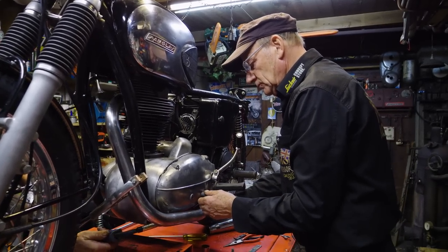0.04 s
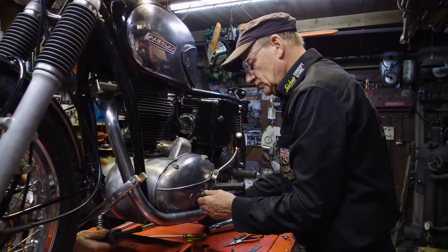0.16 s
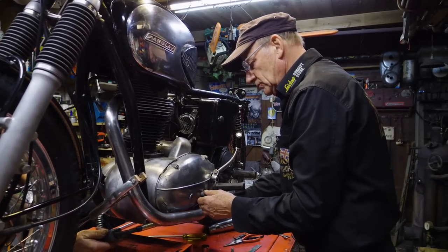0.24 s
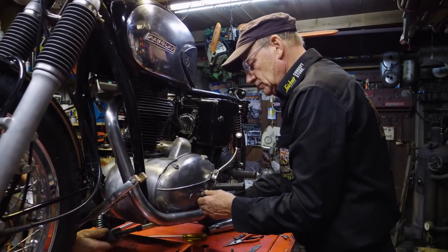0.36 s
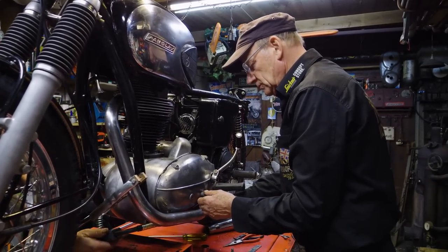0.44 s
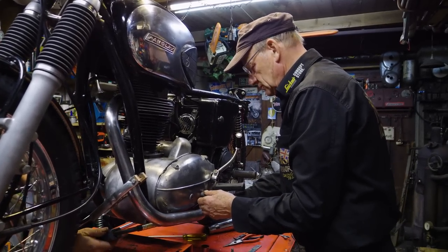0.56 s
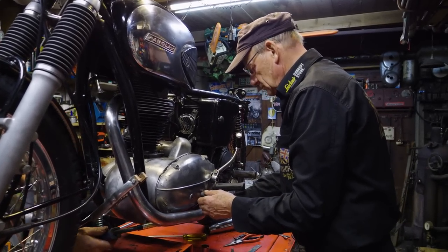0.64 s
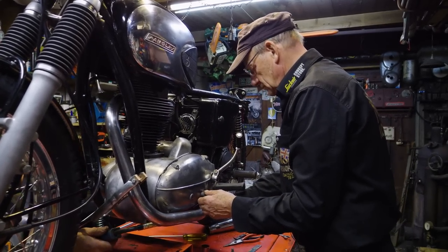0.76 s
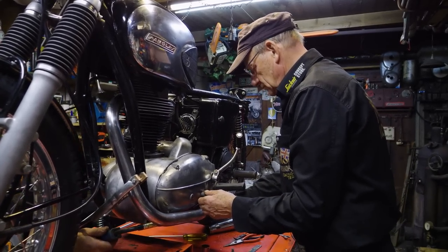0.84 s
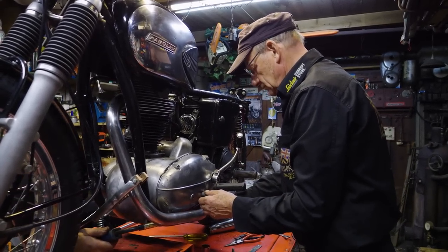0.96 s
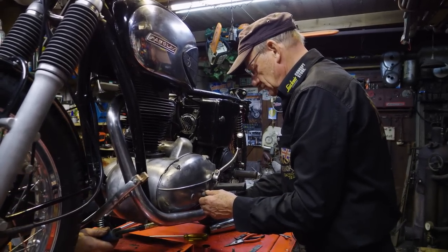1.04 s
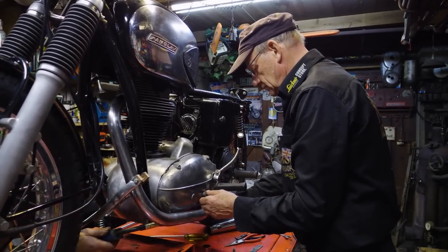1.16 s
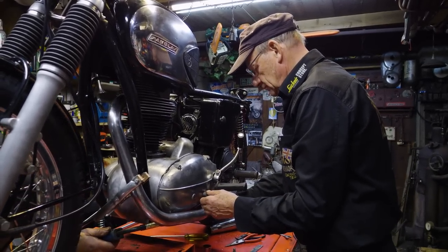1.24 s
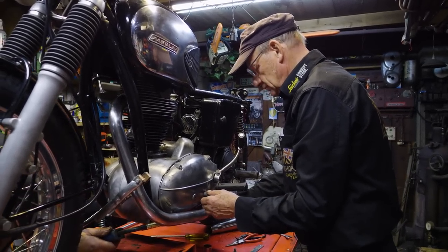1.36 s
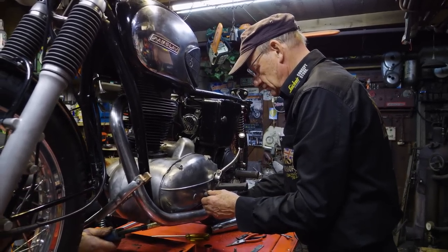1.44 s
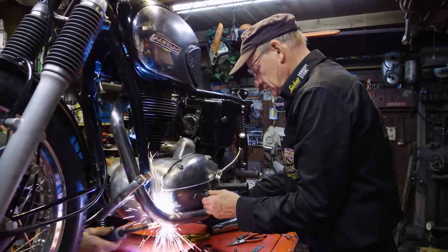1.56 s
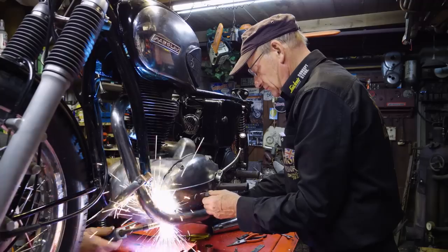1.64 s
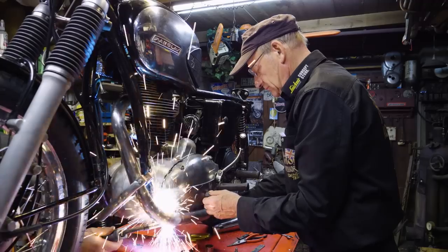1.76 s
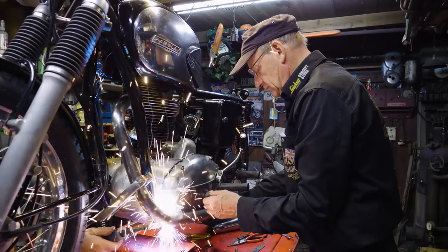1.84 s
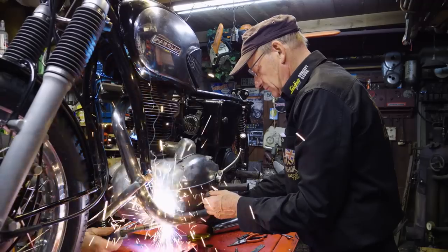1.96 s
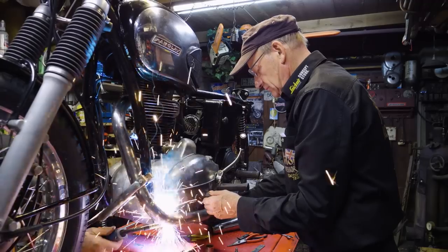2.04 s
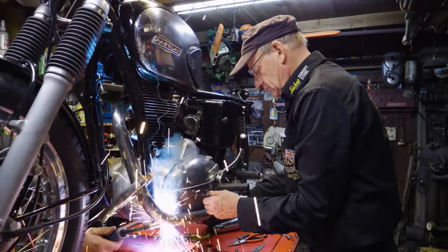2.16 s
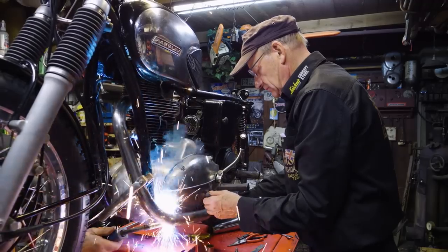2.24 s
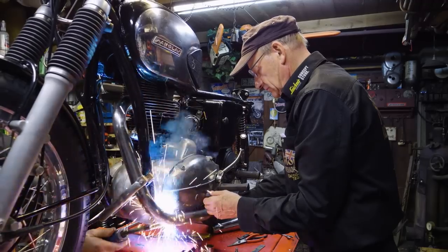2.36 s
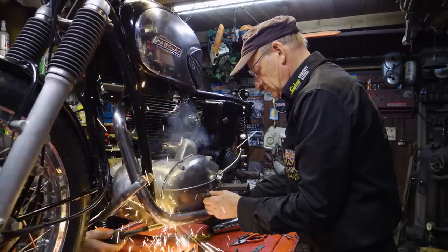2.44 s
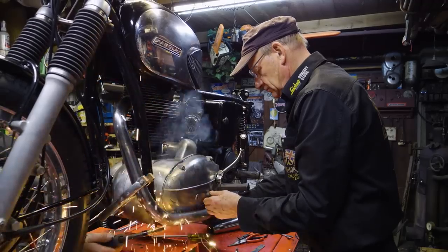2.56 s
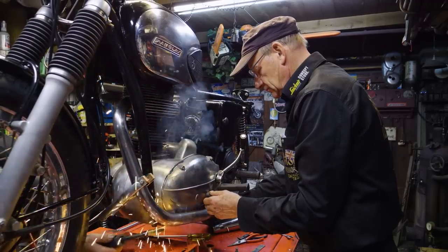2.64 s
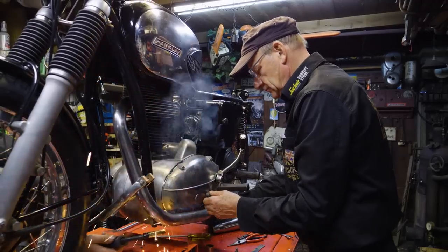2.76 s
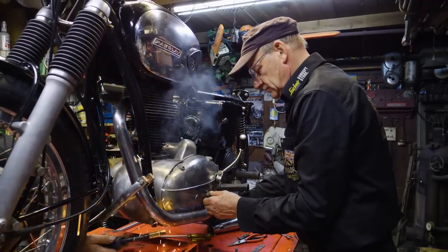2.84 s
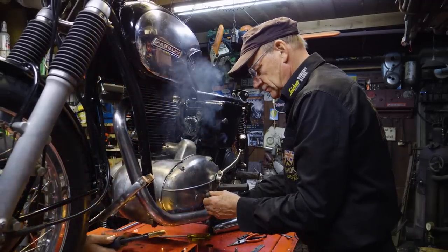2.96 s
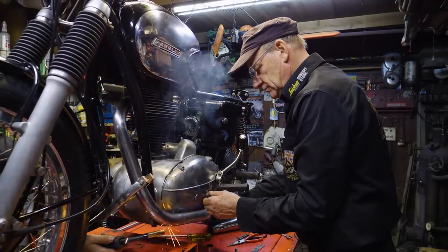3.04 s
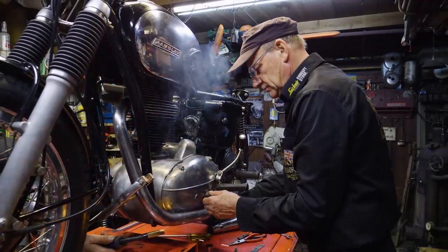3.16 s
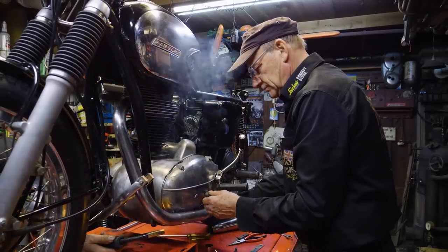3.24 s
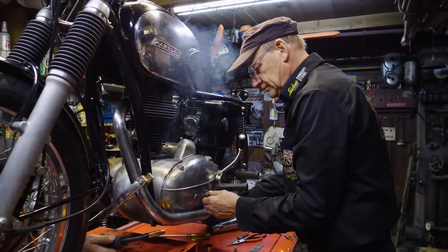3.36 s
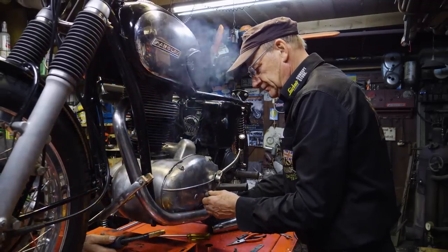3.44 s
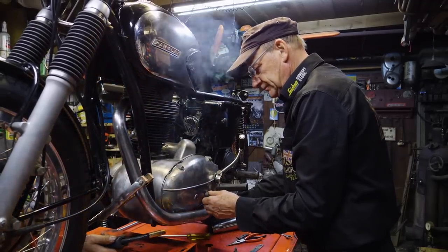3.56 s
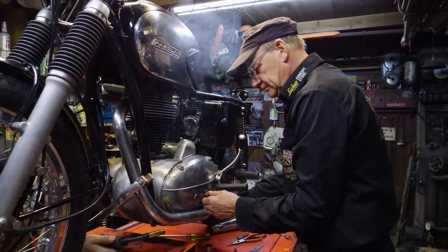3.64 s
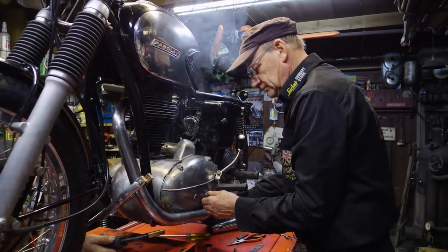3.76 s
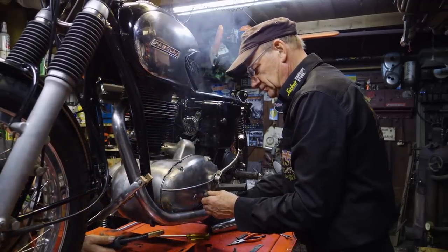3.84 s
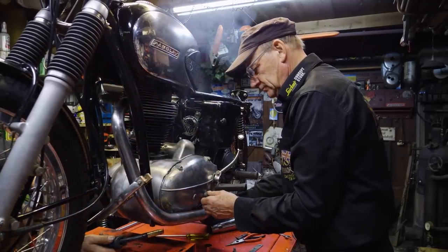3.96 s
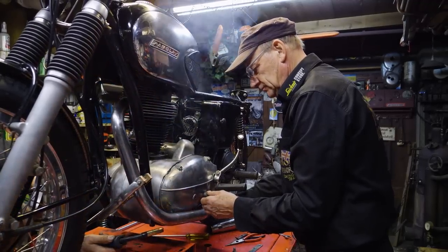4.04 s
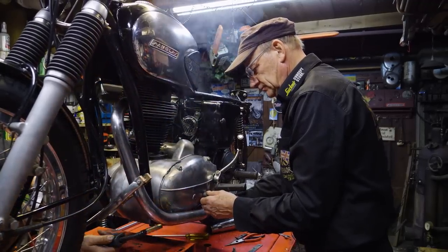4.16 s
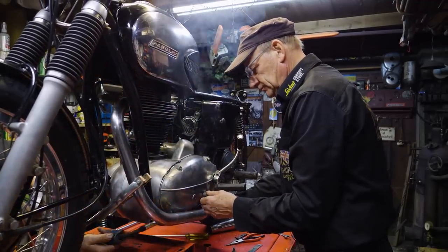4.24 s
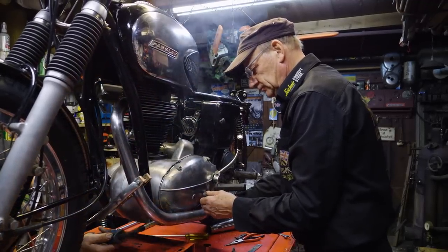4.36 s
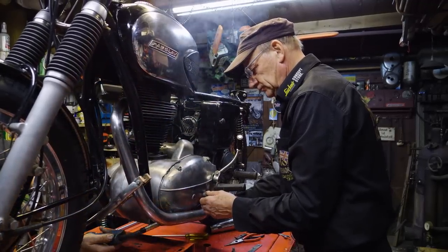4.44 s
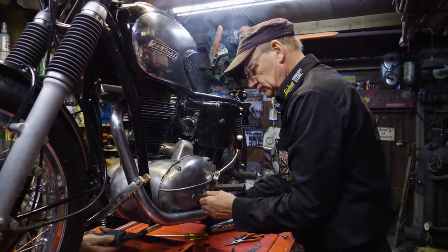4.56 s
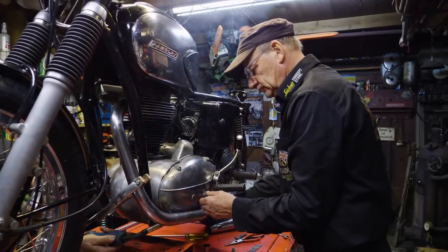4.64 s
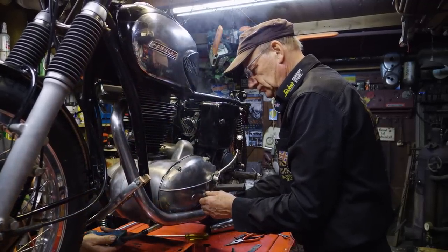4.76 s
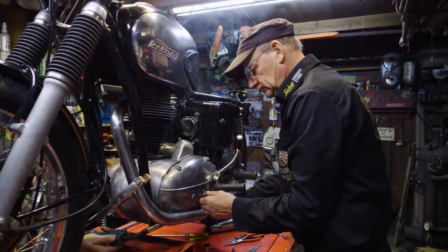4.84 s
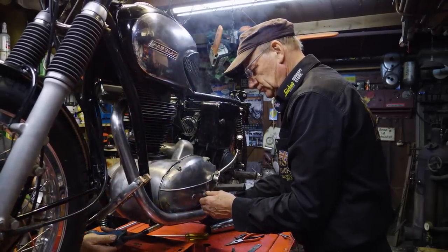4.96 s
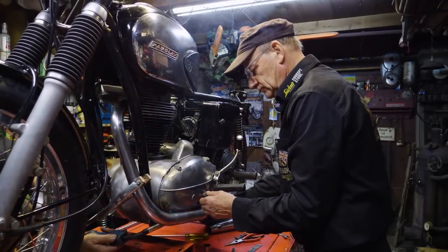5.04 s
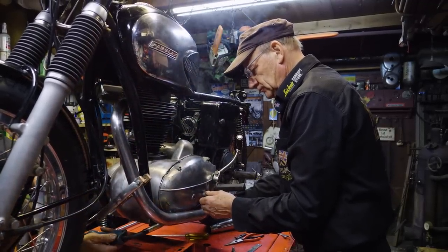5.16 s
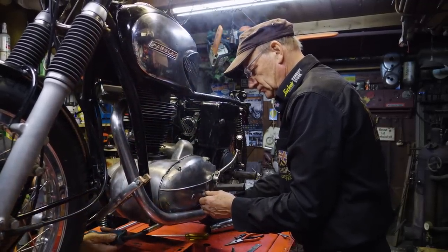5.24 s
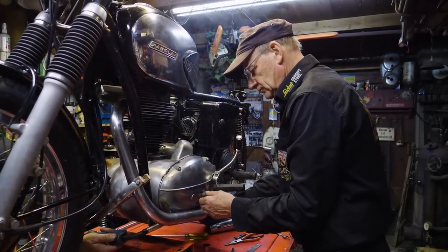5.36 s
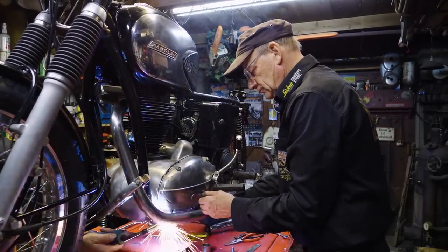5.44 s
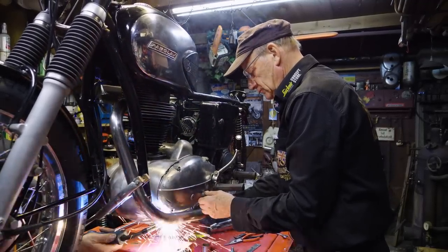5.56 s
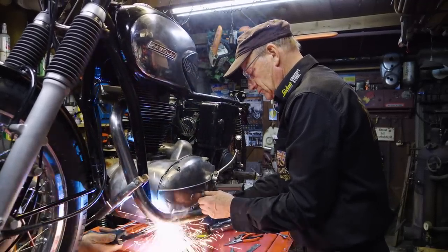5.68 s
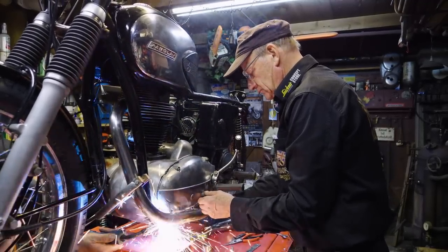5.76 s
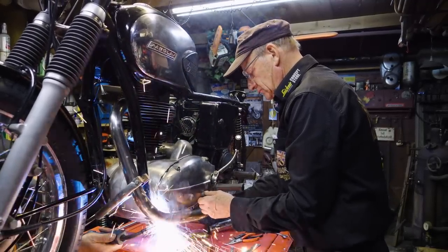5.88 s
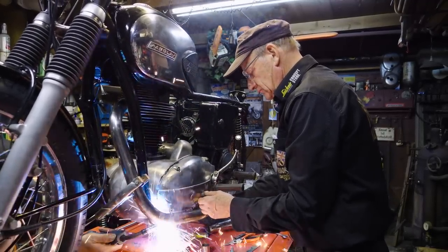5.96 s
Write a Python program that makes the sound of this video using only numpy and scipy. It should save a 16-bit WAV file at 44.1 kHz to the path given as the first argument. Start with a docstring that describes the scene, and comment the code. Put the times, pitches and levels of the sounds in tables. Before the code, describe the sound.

Two short arc welds on a steel pipe crackle harshly over a low hum, with metal knocks, clinks and cooling ticks between them in a workshop.

```python
"""A small workshop: two short wire-arc welds on a steel pipe, heard from a metre away.
Each arc strikes with a flare of spiky noise and a surge of low hum, then crackles in quick pops that
echo off nearby parts. Between the welds, short cracks of noise tick as the bead cools; hands knock,
clink, rub and touch parts, made from dying sines and shaped noise. Air, mains tones and thumps lie below."""
import sys
import numpy as np
from scipy import signal
from scipy.fft import rfft, irfft
from scipy.io import wavfile
from scipy.ndimage import uniform_filter1d

SR = 44100
rng = np.random.default_rng(int(sys.argv[2]) if len(sys.argv) > 2 else 0)


def int16_out(signal):
    """Quantize to a 16-bit WAV file."""
    q = np.round(np.clip(np.atleast_2d(signal).T, -1, 1) * 32767)
    wavfile.write(sys.argv[1], SR, q.astype(np.int16))


def invert_db(x):
    """Field ratio 10**(x/20) for x, a level in decibels (scalar or array-like)."""
    u = np.asarray(x, float) / 20
    return 10 ** u


N = 265085  # samples, about 6 s


def evened(x):
    """Scales a sound to an rms of 1."""
    return x / np.sqrt(np.mean(x ** 2) + 1e-20)


def read(points, hz):
    """Reads a table of values against frequency, on a log frequency axis."""
    f, value = np.transpose(points)
    return np.interp(np.log(hz + 1), np.log(f + 1), value)


def curve(rows):
    """Turns (time [s], level [dB]) into a gain along time; silent outside the table."""
    s, db = np.transpose(rows)
    return invert_db(np.interp(np.arange(N) / SR, s, db, -200, -200))


def add(mix, s, sound, pan_db=0):
    """Lays a sound into both channels from time s; pan_db is left over right."""
    part = mix[:, round(s * SR):][:, :len(sound)]
    part += invert_db([[pan_db / 2], [-pan_db / 2]]) * sound[:part.shape[1]]


def noise(gain, size=N):
    """Noise of rms 1 whose spectrum follows gain(hz)."""
    spectrum = rfft(rng.standard_normal(size))
    return evened(irfft(spectrum * gain(np.fft.rfftfreq(size, 1 / SR)), size))


def humps(modes):
    """Spectrum with a hump at each resonance (Hz, width Hz, dB); their powers add."""
    def gain(hz):
        return np.sqrt(sum(invert_db(2 * db) / (1 + (2 * (hz - f) / w) ** 2) ** 2 for f, w, db in modes))
    return gain


def rung(modes, t):
    """Struck resonances (Hz, dB, t60 s): sines that die by 60 dB in their t60."""
    return sum(invert_db(db - 60 * t / t60) * np.sin(2 * np.pi * hz * t) for hz, db, t60 in modes)


def resonate(x, hz, width):
    """A resonance that follows a moving pitch: shifts it down to zero, smooths twice and shifts back."""
    turn = np.exp(2j * np.pi * np.cumsum(hz) / SR)
    r = np.exp(-np.pi * width / SR)
    smooth = signal.lfilter([(1 - r) ** 2], [1, -2 * r, r * r], x / turn)
    return 2 * (turn * smooth).real


def swells(rows, rise_db_per_s):
    """Gain along time of events (s, dB, held s, t60 s) that rise, hold and die; their powers add."""
    t = np.arange(0, N + 32, 32) / SR
    db = []
    for s, peak_db, held, t60 in rows:
        before, after = np.maximum(s - t, 0), np.maximum(t - s - held, 0)
        db.append(peak_db - rise_db_per_s * before - 60 * after / t60)
    return np.interp(np.arange(N) / SR, t, np.sqrt(invert_db(2 * np.array(db)).sum(0)))


# colour of the hiss and shop air: (frequency [Hz], level per Hz [dB])
AIR_COLOUR = [(30, -42), (60, -24.5), (110, -4.5), (200, -18), (500, -15.5), (1000, -19.5), (2200, -24),
              (5000, -23.5), (9000, -21.5), (15000, -17.5), (16200, -25.5), (17000, -57.5)]
# how alike the air is in left and right: (frequency [Hz], likeness [0 to 1])
AIR_LIKENESS = [(60, 0.87), (240, 0.82), (950, 0.92), (3770, 0.96), (15000, 0.94)]
# how loud the air is over time: (time [s], level [dB])
AIR_LEVEL = [(0, -60.5), (1.4, -59), (2.9, -61.5), (3.7, -65.5), (4.3, -62), (5.2, -62.5), (6.01, -52)]
# tones of lamps and transformer: (frequency [Hz], width [Hz], level [dB])
MAINS_TONES = [(101, 22, -64), (315.8, 9.9, -76.5)]


def background():
    """Microphone hiss and shop air as coloured noise; narrow noise makes wavering mains tones."""
    a, b = (noise(lambda hz: invert_db(read(AIR_COLOUR, hz))) for _ in range(2))
    same = np.clip(read(AIR_LIKENESS, np.fft.rfftfreq(N, 1 / SR)), 0, 1)
    right = irfft(same * rfft(a) + np.sqrt(1 - same ** 2) * rfft(b), N)
    mains = sum(invert_db(db) * noise(humps([(hz, w, 0)])) for hz, w, db in MAINS_TONES)
    return curve(AIR_LEVEL) * np.array([a, right]) + mains


# how long the room rings: (frequency [Hz], t60 [s])
ROOM_DECAY = [(150, 0.83), (500, 0.32), (2000, 0.28), (6000, 0.26), (14000, 0.099)]


def shop(x):
    """Room echo: sparse taps of random sign, each frequency band dying at its own speed."""
    taps = np.zeros((2, SR // 2))
    # one tap in every 20 samples, at a random place
    at = np.arange(260, SR // 2 - 20, 20) + rng.integers(0, 20, (2, (SR // 2 - 261) // 20))
    np.put_along_axis(taps, at, rng.choice([-1., 1.], at.shape), 1)
    taps = taps[0] + 0.26 * np.array([taps[1], -taps[1]])  # the two microphones sit close together
    hz, t, z = signal.stft(taps, SR, nperseg=256)
    fade = invert_db(-60 * t / read(ROOM_DECAY, hz)[:, None])
    tail = signal.istft(z * fade, SR, nperseg=256)[1]
    return signal.oaconvolve(x, tail / np.linalg.norm(tail[0]), axes=1)[:, :N]


# low tones of the hum: (frequency [Hz], width [Hz], level [dB])
HUM_TONES = [(148.5, 25, -2.5), (180.1, 63, -8), (114.5, 25, -6.5)]
# the welder takes load: (time of the surge [s], surge level [dB], steady level [dB], end [s])
WELDER_LOADS = [(1.575, -19, -38, 2.46), (5.476, -18.5, -36, 6.01)]
# low thumps through the bench: (time [s], level [dB], held [s], t60 [s])
BENCH_THUMPS = [(.52, -48, 0.0088, 0.3), (.79, -45, .02, 0.72), (.95, -42, 0.005, 0.22),
                (2.48, -34, 0.005, .3), (2.64, -37.5, 0.005, .2), (3.92, -66, .02, .5),
                (4.45, -41.5, 0.005, 0.86), (4.84, -39, 0.075, 0.19), (5.31, -38, 0.0047, 0.097),
                (5.56, -31.5, 0.0038, 0.048)]


def hum():
    """The hum surges as the arc strikes, settles under load and dies away; thumps ring the same low tones."""
    idle_db, rise_s, fall_s, bend, unload_t60 = -73.5, .075, .047, 2.1, .88
    t = np.arange(N) / SR
    power = invert_db(2 * idle_db) + swells(BENCH_THUMPS, rise_db_per_s=400.5) ** 2
    for s, surge_db, load_db, end in WELDER_LOADS:
        off = np.maximum((s - t) / rise_s, (t - s) / fall_s)
        power += invert_db(2 * np.maximum(surge_db - 30 * off ** bend, -200))  # 30 dB down at either end
        power += (t > s) * invert_db(2 * (load_db - 60 * np.maximum(t - end, 0) / unload_t60))
    return np.sqrt(power) * noise(humps(HUM_TONES)) * invert_db([[-1], [1.2]])


# hands slide a hollow part: (time [s], level [dB], pitch [Hz], held [s], t60 [s])
HAND_SLIDES = [(.08, -55.5, 519, .002, 0.26), (0.293, -51, 690, 0.0023, .19), (.45, -67, 474, .27, .3),
               (0.751, -34, 512, 0.018, .1), (.775, -28, 601, 0.082, 0.15),
               (0.949, -30, 524, 0.0014, 0.022), (.988, -45.5, 494, .002, 0.14),
               (1.43, -63.5, 589, 0.12, .1), (2.58, -44.5, 603, 0.043, 0.12),
               (2.691, -33.5, 602, .002, 0.133), (2.75, -59.5, 601, .01, 0.85),
               (3.118, -62.5, 577, .002, .18), (3.246, -53.5, 554, .002, 0.21), (3.405, -54, 513, .02, .1),
               (4.37, -58.5, 732, 0.021, .1), (4.439, -22, 757, .014, .03),
               (4.499, -27, 552, 0.0016, 0.036), (4.511, -45, 506, .002, 0.42),
               (4.66, -53.5, 530, .16, .05), (4.85, -45, 420, 0.0023, 0.57),
               (5.136, -54.5, 554, .002, 0.39), (5.262, -49, 536, .002, .08),
               (5.305, -37.5, 450, .04, 0.11), (5.364, -33.5, 561, .01, 0.22)]
# broad sound under the pitch of the hollow part: (frequency [Hz], width [Hz], level [dB])
HOLLOW_BODY = [(600, 700, 0)]
# steel scrapes on steel: (time [s], level [dB], level of the bright part [dB], held [s], t60 [s])
STEEL_SCRAPES = [(.08, -64, -71, .002, .3), (.285, -73, -63, .01, 0.32), (.59, -63, -67.5, 0.036, 0.55),
                 (.746, -51.5, -56.5, 0.026, .1), (0.792, -29, -28, 0.0018, 0.044),
                 (.805, -37, -42, .005, .25), (.95, -50, -54, .02, 0.12), (.978, -49, -51, .07, .06),
                 (2.58, -47.5, -54, .002, 0.18), (2.656, -62, -55.5, .002, .1),
                 (2.75, -64.5, -62, 0.13, .3), (3.0, -79, -56.5, .002, .6),
                 (3.118, -71.5, -50, 0.0018, 0.27), (3.246, -55, -51.5, .002, 0.15),
                 (3.413, -57, -60, 0.0018, 0.059), (4.37, -51, -65, .002, .11),
                 (4.44, -28.5, -52, .002, 0.02), (4.5, -39, -44, .002, .05),
                 (4.512, -55, -52.5, .002, 0.41), (4.668, -48.5, -58, 0.0025, .16),
                 (4.76, -50, -54, .002, 0.066), (4.8, -59, -60, 0.036, .1),
                 (4.85, -51.5, -53.5, .002, 0.43), (5.11, -83.5, -66, .002, .3),
                 (5.262, -76, -60, .002, .1), (5.305, -42, -38, 0.021, .2), (5.355, -41, -33.5, 0.042, .05)]
# colour of the scrape: (frequency [Hz], width [Hz], level [dB])
SCRAPE_COLOUR = [(1670, 770, 5.5), (2210, 440, 7.5), (3160, 890, 0)]
# colour of its bright part: (frequency [Hz], width [Hz], level [dB])
BRIGHT_COLOUR = [(4700, 5700, 3.5), (6960, 1400, 1.5), (10900, 5900, 2)]


def rubs():
    """Uneven slips drive the hollow body; a grainy scrape lies above."""
    slips = invert_db(2.5 * evened(uniform_filter1d(rng.standard_normal((2, N)), 250)))
    slide, scrape = np.array(HAND_SLIDES), np.array(STEEL_SCRAPES)
    wide = noise(humps(HOLLOW_BODY))
    pitch = np.interp(np.arange(N) / SR, slide[:, 0], slide[:, 2])
    body = 2.1 * wide + evened(resonate(wide, pitch, width=210))
    layers = [(slide[:, [0, 1, 3, 4]], body * slips[0]),
              (scrape[:, [0, 1, 3, 4]], noise(humps(SCRAPE_COLOUR)) * slips[1]),
              (scrape[:, [0, 2, 3, 4]], noise(humps(BRIGHT_COLOUR)) * slips[1])]
    return sum(swells(rows, rise_db_per_s=751.5) * evened(layer) for rows, layer in layers)


# touched parts: (time [s], level [dB], frequency [Hz], rise [s], t60 [s])
TOUCH_TONES = [(.8, -46, 11170, .025, .2), (.936, -22.5, 600, 0.0037, .07), (2.622, -36, 613, .008, .15),
               (2.664, -38, 600, .003, .05), (2.682, -29, 588, 0.0069, .13), (3.41, -34, 538, 0.0051, .08),
               (4.458, -26, 549, 0.0027, 0.13), (4.834, -49.5, 2850, .002, 0.41),
               (4.834, -47, 1515, 0.0019, 0.21)]


def tones():
    """A touched part sounds one clear tone: a sine that swells briefly and dies."""
    out, t = np.zeros((2, N)), np.arange(SR // 3) / SR
    for s, db, hz, rise, t60 in TOUCH_TONES:
        add(out, s, rung([(hz, db, t60)], t) * (1 - np.exp(-(t / rise) ** 2)), -1)
    return out


# the louder ticks: (time [s], peak level [dB], centre [Hz], left over right [dB])
LOUD_TICKS = [(2.7336, -37.5, 6550, 2.5), (2.8571, -37.5, 4630, -3), (2.8906, -38, 11500, 2.5),
              (2.9827, -40, 11660, 3.5), (3.0043, -32.5, 4640, 1.5), (3.0445, -34, 4180, 1),
              (3.0534, -40.5, 10400, 2), (3.0654, -34, 2700, 3), (3.1144, -29, 3200, 1),
              (3.1178, -20, 10300, 1.5), (3.1386, -29, 10800, 1), (3.154, -32.5, 11300, 0),
              (3.2265, -37.5, 8500, -2.5), (3.2395, -34, 8760, -2.5), (3.2474, -35, 4500, -1.5),
              (3.261, -32.5, 9500, -2), (3.2992, -37, 8830, 0), (3.3025, -37.5, 8600, 2.5)]
# lowest and highest values of a faint tick, same columns:
# (time [s], peak level [dB], centre [Hz], left over right [dB])
FAINT_TICK_RANGE = (2.75, -47.5, 3300, -5.5), (3.35, -37, 11050, 4)


def ticks():
    """The bead ticks as it cools: tiny wide cracks of glassy slag, some at random times."""
    out, t = np.zeros((2, N)), np.arange(SR // 10) / SR
    faint = rng.uniform(*FAINT_TICK_RANGE, size=(10, 4))
    for s, db, hz, pan_db in [*LOUD_TICKS, *faint]:
        crack = noise(humps([(hz, 0.34 * hz, 0), (9000, 9000, -6)]), len(t))
        crack *= invert_db(-60 * t / 0.017) + invert_db(-15.5 - 60 * t / 0.07)  # a quick fade, then a weaker slow one
        add(out, s, invert_db(db) * crack / abs(crack).max(), pan_db)
    return out


# the wire tip skids on the steel: time [s], level [dB], t60 [s],
# ring (frequency [Hz], width [Hz], level [dB])
WIRE_SKID = 5.272, -16, 0.094, [(5990, 400, -2), (7460, 360, 2), (8000, 500, 7), (8870, 360, 10),
             (14500, 5700, -10.5), (5000, 12000, -21)]


def skid():
    """A bright, rough ring of thin wire, made of dying noise."""
    out, t = np.zeros((2, N)), np.arange(SR // 4) / SR
    s, db, t60, ring = WIRE_SKID
    add(out, s, noise(humps(ring), len(t)) * invert_db(db - 60 * t / t60), 1.5)
    return out


# metal on metal: (time [s], peak level of the crack [dB], its centre [Hz], its t60 [s],
# nozzle ring level [dB], pipe ring level [dB])
METAL_CLINKS = [(0.777, -9.5, 4700, 0.028, -38.5, -47.5), (4.458, -14.5, 3210, 0.081, -21.5, -62.5),
                (4.489, -12, 5240, 0.022, -37, -38.5), (4.725, -27, 4110, 0.12, -55.5, -72),
                (4.832, -20.5, 5000, 0.033, -61, -82)]
# ringing of the torch nozzle: (frequency [Hz], level [dB], t60 [s])
NOZZLE_RING = [(3200, 6.5, 0.071), (3920, -0.5, 0.043), (4530, -10.5, 0.075), (7000, -14, .08),
               (8400, -5.5, 0.072), (8690, -6, 0.094), (10330, -22, 0.066), (11800, -21.5, .12)]
# ringing of the pipe: (frequency [Hz], level [dB], t60 [s])
PIPE_RING = [(5534, 0, .4), (7811, -10, .2), (11170, -7, .2), (11940, -8, .35)]


def clinks():
    """A noisy crack, and the steel of nozzle and pipe rings on."""
    out, t = np.zeros((2, N)), np.arange(SR // 2) / SR
    for s, db, hz, t60, nozzle_db, pipe_db in METAL_CLINKS:
        crack = noise(humps([(hz, 0.54 * hz, 0), (8000, 9000, -6)]), len(t))
        crack *= invert_db(-60 * t / t60) * (1 - np.exp(-t / 0.00051))
        ring = invert_db(nozzle_db) * rung(NOZZLE_RING, t) + invert_db(pipe_db) * rung(PIPE_RING, t)
        add(out, s, invert_db(db) * crack / abs(crack).max() + ring, -1.5)
    return out


# knocks: (time [s], peak level [dB], favoured low pitch [Hz], favoured high pitch [Hz],
# high side against the low [dB], t60 [s])
HAND_KNOCKS = [(0.08, -43, 687, 2380, -2, 0.096), (0.261, -38.5, 280, 2370, 14, 0.029),
               (0.292, -28.5, 700, 1480, -23, 0.04), (0.777, -14, 680, 2206, -13, 0.087),
               (0.934, -14.5, 444, 1375, -15, 0.053), (3.509, -13.5, 735, 2670, -3.5, 0.04),
               (4.346, -31.5, 860, 2060, 3.5, 0.091), (4.431, -13.5, 875, 1314, -10, 0.12),
               (4.652, -32, 323, 2090, 3.5, 0.11), (4.831, -15.5, 344, 2780, -10.5, 0.049),
               (4.855, -28, 375, 2050, -15, 0.047), (4.87, -28, 418, 2840, -11.5, 0.025),
               (4.897, -29, 400, 2960, -12.5, 0.049), (5.29, -8.5, 447, 1430, 5, 0.066)]
# what the engine case and bench ring with: (frequency [Hz], level [dB], share of the knock's t60 [ratio])
CASE_RING = [(336, 0.5, 0.92), (405.7, 0.5, 1.36), (554, 2, 0.88), (675, -4, 0.77), (790, 0.5, .9),
             (875, -3, 0.59), (1018, 2.5, 1.2), (1227, -2, 0.53), (1578, 2, 0.52), (1990, 0.5, 0.55),
             (2060, -2.5, 0.93), (2380, -4, 0.9), (2610, -6, 0.99), (2694, -7.5, 0.66), (2850, 0, 0.9),
             (3610, 0, .8)]


def knocks():
    """A short push rings the modes near the two pitches that the blow favours; a crack of noise rides on top."""
    out, t = np.zeros((2, N)), np.arange(SR // 4) / SR
    for s, db, hz, upper_hz, upper_db, t60 in HAND_KNOCKS:
        modes = []
        for f, mode_db, share in CASE_RING:
            near_low = -14 * abs(np.log2(f / hz))  # dB lost per octave away
            near_high = upper_db - 16 * abs(np.log2(f / upper_hz))
            modes.append((f, mode_db + max(near_low, near_high), share * t60))
        crack = noise(humps([(upper_hz, 2000, 0), (hz, 700, 0), (6000, 5000, -12)]), len(t))
        crack *= invert_db(upper_db + 2.0 - 60 * t / 0.026)
        blow = rung(modes[::2], t) - rung(modes[1::2], t) + crack  # neighbours start in opposite directions
        blow *= 1 - np.exp(-t / .0005)
        add(out, s, invert_db(db) * blow / abs(blow).max(), -1.5)
    return out


# long arcs that hiss, and the hot pool after the last pop: (time [s], level [dB],
# low part against the high [dB], held [s], t60 [s])
ARC_FLARES = [(1.501, -21, 4.5, 0.012, 0.24), (1.581, -16.5, -12, 0.0064, 0.078),
              (1.599, -28.5, -6.5, 0.04, 0.14), (2.435, -32, -1.5, 0.062, 0.35),
              (5.409, -22.5, 3.5, 0.023, 0.22), (5.49, -17, -0.5, 0.012, 0.029),
              (5.521, -23.5, 1.5, 0.024, .04), (5.585, -19.5, -8, 0.018, 0.044),
              (5.612, -24.5, -9, 0.022, 0.1), (5.654, -19.5, -4, .02, 0.03),
              (5.724, -23.5, -7.5, 0.018, .08)]
# colour of the hiss: (frequency [Hz], level per Hz [dB])
FLARE_COLOUR = [(1180, -20.5), (2000, -15.5), (3650, -0.5), (10600, 4), (13500, 5), (15000, 2), (16500, -4)]


def flares():
    """Bursts of spiky hiss with a sudden start; the low part swells a little later."""
    out, t = np.zeros((2, N)), np.arange(SR // 4) / SR
    for s, db, low_db, held, t60 in ARC_FLARES:
        spikes = invert_db(3.5 * evened(uniform_filter1d(rng.standard_normal(len(t)), 16)))
        high = noise(lambda hz: invert_db(read(FLARE_COLOUR, hz)), len(t)) * spikes
        low = noise(humps([(850, 800, 0), (2000, 1000, -4)]), len(t)) * (1 - np.exp(-t / .012))
        fade = invert_db(db - 60 * np.maximum(t - held, 0) / t60)
        add(out, s, fade * (high + invert_db(low_db) * low))
    return out


# the wire shorts and the arc relights, the lone and the largest pops: (time [s], level [dB])
LARGE_POPS = [(1.5818, -1.5), (1.5884, 6.5), (1.5905, 7), (1.6276, 8.5), (1.6337, 5), (1.6664, 6.5),
              (1.6856, 7.5), (1.7002, 4), (1.7092, .5), (1.7265, 5.5), (1.7447, 4.5), (1.8022, 8),
              (1.8404, 5), (1.8575, 5), (1.8939, 2), (1.905, 7), (1.9345, 6), (1.948, 4.5), (1.9835, 5.5),
              (2.0026, 5), (2.025, 5), (2.051, 8.5), (2.091, 8), (2.1358, 5.5), (2.1514, 7), (2.1825, 6.5),
              (2.1947, 7.5), (2.2478, 8), (2.2926, 6), (2.3091, 8), (2.3669, 7.5), (2.4015, 6), (2.4142, 2),
              (2.4303, 4.5), (2.47, 12), (5.4957, 6), (5.5029, 7.5), (5.5095, 9), (5.5441, 9),
              (5.5473, 8.5), (5.586, 3.5), (5.6031, 7.5), (5.6287, 5.5), (5.668, 5), (5.6913, 5.5),
              (5.7008, 6), (5.714, 7), (5.7585, 10), (5.7687, 3), (5.7804, 6.5), (5.7892, 3.5),
              (5.8062, 5.5), (5.8429, 5.5), (5.8707, 5.5), (5.8881, 9.5), (5.9233, 5), (5.9554, 5.5),
              (5.9792, 4), (5.9932, 7.5)]
# runs of even crackle between stalls of the wire: (start [s], end [s], level of a usual pop [dB])
CRACKLE_RUNS = [(1.734, 1.792, 2), (1.803, 1.918, 2), (1.926, 2.025, 3), (2.034, 2.052, 2.5),
                (2.06, 2.43, 4), (5.586, 5.603, 2.5), (5.676, 5.736, 3), (5.81, 5.877, 4.5),
                (5.924, 5.98, 4.5), (5.991, 6.01, 2.5)]


def pops():
    """The large pops, and runs of smaller ones at uneven spacing: a drop of wire grows, then shorts."""
    drop_s, drop_spread, size_spread_db = .0052, .3, 1.8
    before_s, rest_s = .0025, .005  # no small pop just before a large one, and a rest after it
    large, rows = np.array(LARGE_POPS), []
    for start, end, db in CRACKLE_RUNS:
        wait, size = rng.standard_normal((120, 2)).T
        s = start + np.cumsum(drop_s * np.exp(drop_spread * wait))
        since = s[:, None] - large[:, 0]
        crowded = ((since > -before_s) & (since < rest_s)).any(1)
        free = ~crowded & (s < min(end, N / SR))
        rows.append(np.c_[s, db + size_spread_db * size][free])
    return np.concatenate([large] + rows).T


def causal(points, size=4096):
    """Shortest pulse with the given colour: all its energy comes as early as it can."""
    log_gain = np.log(invert_db(read(points, abs(np.fft.fftfreq(size, 1 / SR)))))
    return np.fft.ifft(np.exp(np.conj(signal.hilbert(log_gain)))).real[:size // 4]


def pop_shape(colour, echoes, rings):
    """One pop: blast, quick echoes off the parts nearby, and their ringing; alike for every pop at a spot."""
    scatter_db, scatter_t60, clutter_db, clutter_t60 = 10, .011, 7, .03
    t = np.arange(4096) / SR
    # the nearest parts scatter the blast over its first milliseconds
    fade = invert_db(-60 * t / clutter_t60) + invert_db(scatter_db - 60 * t / scatter_t60)
    both, apart = rng.standard_normal((2, len(t))) * fade
    apart = .04 * apart + .25 * np.gradient(apart)  # the microphones differ most in the treble
    clutter = invert_db(clutter_db) * (both + np.array([apart, -apart])) / np.linalg.norm(both)
    arrivals = sum(size * np.sinc(t * SR - 8 - ms * SR / 1000) for ms, size in echoes)
    spread = rfft(clutter + arrivals)
    # echoes spread the blast and keep its colour
    spread /= np.sqrt(uniform_filter1d(abs(spread.mean(0)) ** 2, size=36))
    shape = irfft(spread * rfft(causal(colour), len(t))) * (t < .07)
    # the wider a resonance, the sooner it dies
    ring = rung([(f, db + 20 * np.log10(w), 3.2 / w) for f, w, db in rings[::2]], t)
    ring -= rung([(f, db + 20 * np.log10(w), 4.1 / w) for f, w, db in rings[1::2]], t)
    shape += invert_db(-6) * np.linalg.norm(shape[0]) * ring / np.linalg.norm(ring)
    return shape / np.linalg.norm(shape[0])


# the two welds: (start [s], end [s], least level of the small sputters [dB], steady fizz level [dB],
# blast colour (frequency [Hz], level per Hz [dB]), arrival and first echoes (delay [ms], signed size [ratio]),
# ringing of the parts round the spot (frequency [Hz], width [Hz], level [dB]))
WELD_SPOTS = [(1.69, 2.44, -24, -33.5, [(35, -61.5), (60, -22), (108, -16.5), (169, -13.5), (509, -6.5),
              (983, -1.5), (1540, -17.5), (1690, -6.5), (2240, -8), (2580, -17), (5340, -12.5),
              (7250, -11.5), (9840, -10.5), (15400, -16), (16500, -22.5)], [(0, 0.75), (.12, 1),
              (.19, 0.43), (.3, -0.58), (.6, -0.0079), (.95, -0.15), (1.9, -0.054), (2.95, 0.32)],
              [(984, 17.6, -2), (1750, 130, -0.5), (4426, 153, -4), (5270, 540, 2.5), (6460, 79, 0.5),
              (6960, 79, -14.5), (6640, 93, -1), (7960, 43, -3.5), (7890, 81, -9), (9030, 51, -12.5),
              (9430, 83, 13.5), (9930, 43, 11), (10320, 30, -5), (10790, 43, -11), (10650, 75, -9.5),
              (12850, 160, -19), (12350, 36, -8), (13200, 28, -11), (13930, 88, -8.5), (13670, 43, -12.5)]),
              (5.65, 6.01, -22, -34, [(35, -51), (60, -28), (161, -9), (497, -7.5), (983, 1.5),
              (1500, -14.5), (1690, -9), (2520, -12.5), (4030, -10), (5340, 0), (6450, -15), (7780, -6.5),
              (14000, -8.5), (15400, -12.5), (16500, -21.5)], [(0, 0.59), (.07, -1.4), (.28, -1.1),
              (.34, 0.69), (.8, -0.17), (1.35, 0.19), (1.8, 0.029), (2.6, -0.016)], [(998, 45, -11),
              (4480, 53, -2), (5124, 150, 7), (5210, 83, -4), (5820, 130, -9.5), (7960, 250, 9.5),
              (8030, 200, 8), (9330, 120, -6), (10200, 76, -1.5), (10460, 29, -1), (10600, 110, -3),
              (12000, 240, -3), (12350, 150, -8), (13620, 88, -2), (13500, 110, 7.5), (14500, 140, -2.5)])]


def crackle():
    """Pops, small sputters and fizz excite the spot; each pop is ragged for a fraction of a millisecond."""
    s, db = pops()
    clicks, out = np.zeros(N + SR), np.zeros((2, N))
    at = np.round(s * SR).astype(int)
    rag = np.diff(rng.standard_normal((len(s), 13)) * 0.2 * np.exp(-np.arange(13) / 4.5))
    clicks[at] = invert_db(db)
    np.add.at(clicks, at[:, None] + 1 + np.arange(12), clicks[at, None] * rag)
    t, second = np.arange(N) / SR, np.arange(N) > N // 2  # the second weld owns the later half
    for k, (start, end, sputter_db, fizz_db, *spot) in enumerate(WELD_SPOTS):
        size = invert_db(sputter_db + 5.5 * np.minimum(rng.exponential(1, N), 4))
        sputters = size * (rng.random(N) < 900 / SR)  # about 900 a second
        burning = sputters + invert_db(fizz_db) * rng.standard_normal(N)
        drive = clicks[:N] * (second == k) + burning * (t > start) * (t < end)
        out += signal.oaconvolve(drive[None], pop_shape(*spot), axes=1)[:, :N]
    return out


def scene():
    """Arc and handling share the room echo; the blows send the least into it."""
    arc = crackle() + flares()
    blows = knocks() + clinks()
    hands = skid() + ticks() + rubs() + tones()
    wet = shop(invert_db(-11) * arc + invert_db(-22) * blows + invert_db(-14.5) * hands)
    return arc + blows + hands + wet + hum() + background()


def roll_off(x):
    """The treble ends steeply here."""
    return signal.sosfilt(signal.butter(12, 15850, fs=SR, output="sos"), x)


def record(dry):
    """The microphone drops the deep bass, and the loudest peaks round off."""
    thin = signal.sosfilt(signal.butter(2, 90, "high", fs=SR, output="sos"), dry)
    ceiling = .96  # of full scale
    rounded = thin / (1 + abs(thin / ceiling) ** 4) ** .25
    return roll_off(rounded)


dry = scene()
out = record(dry)
int16_out(out)
```